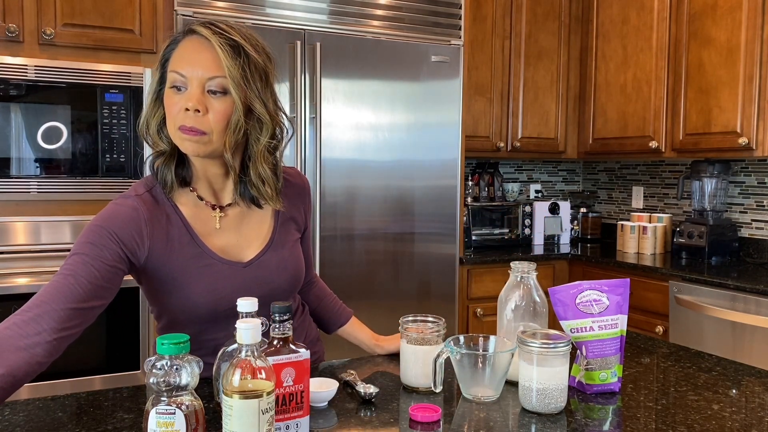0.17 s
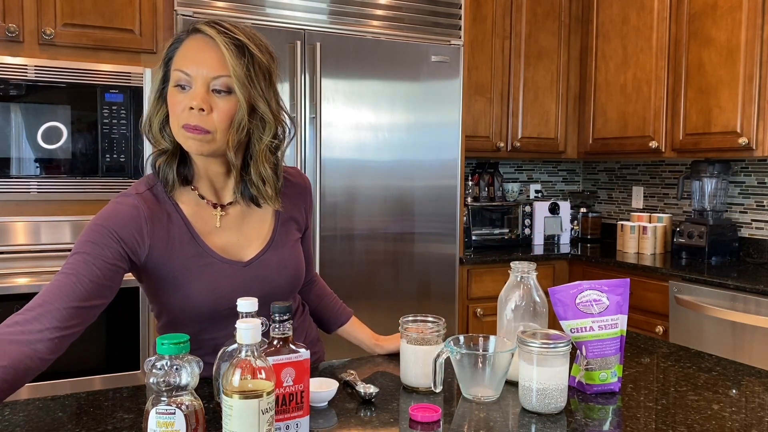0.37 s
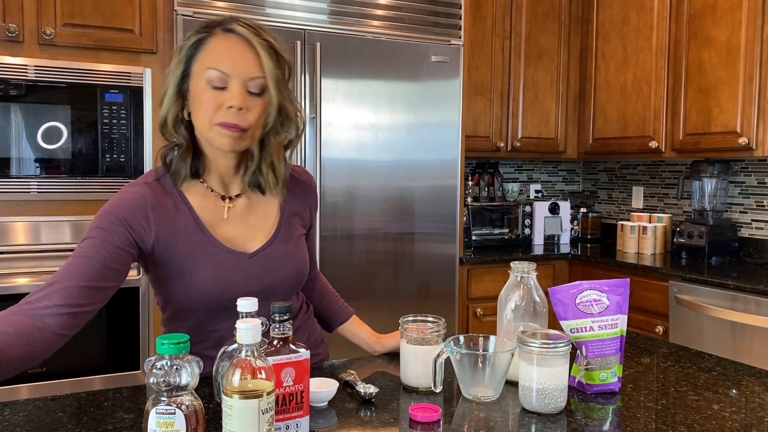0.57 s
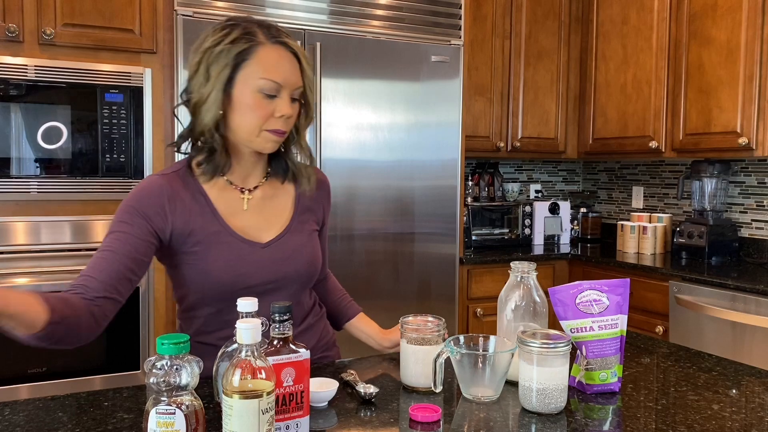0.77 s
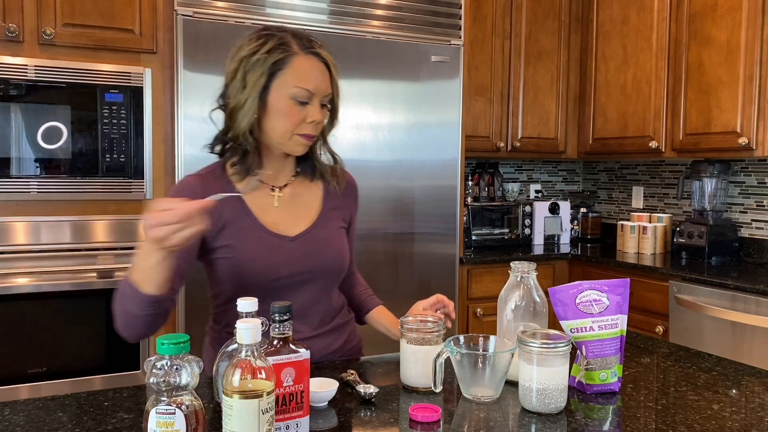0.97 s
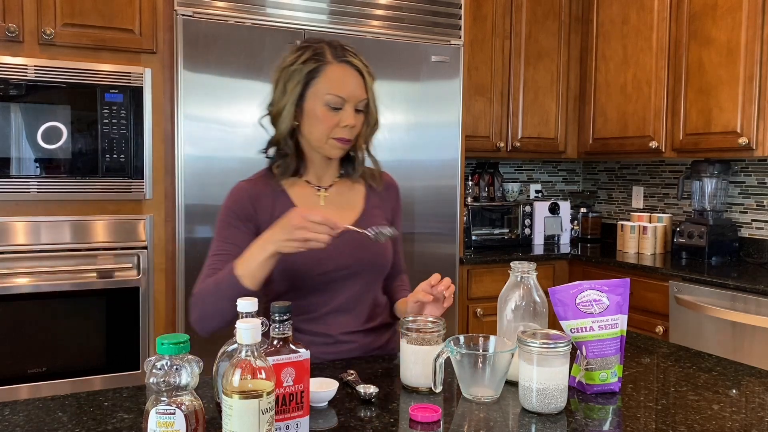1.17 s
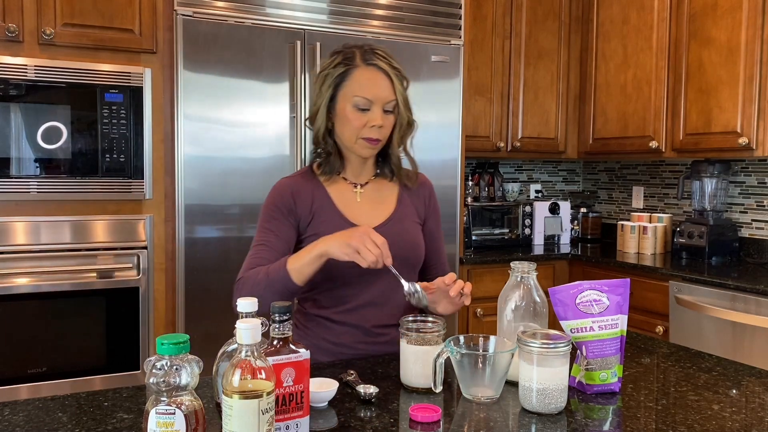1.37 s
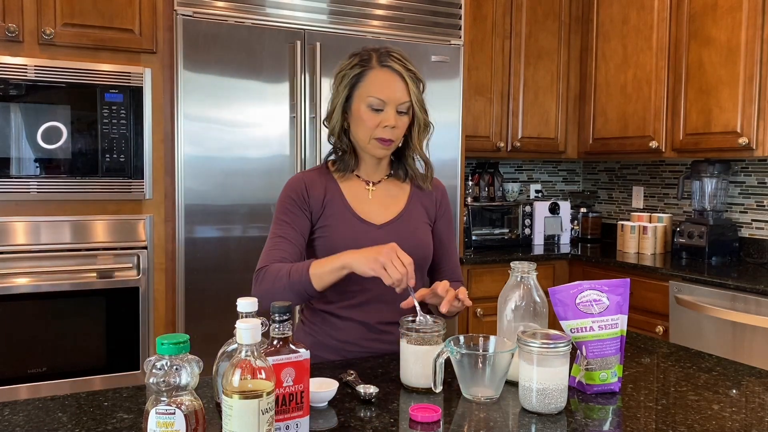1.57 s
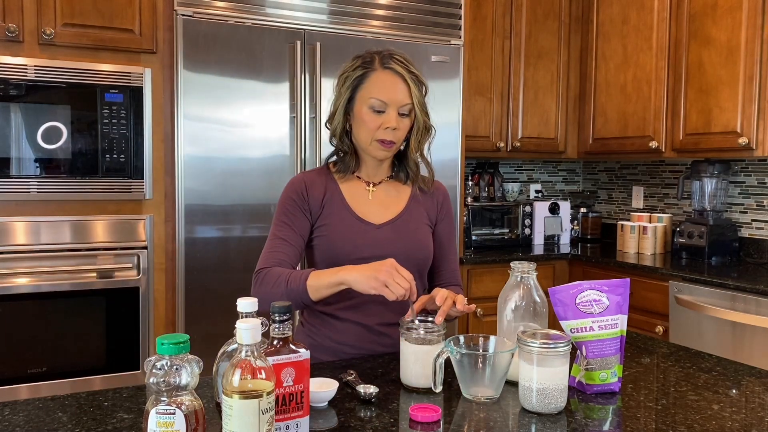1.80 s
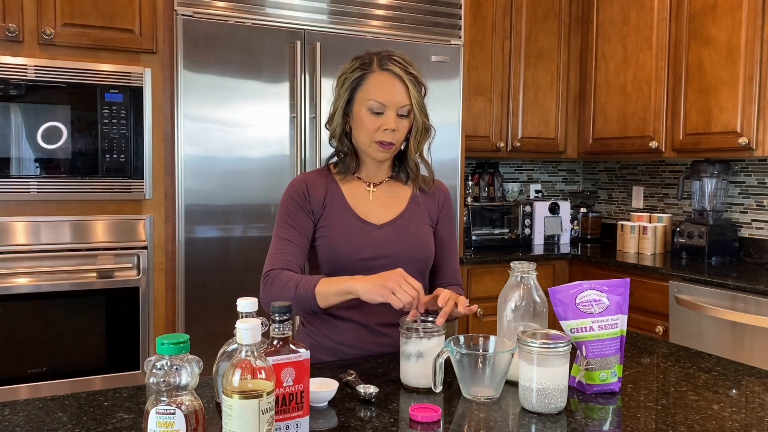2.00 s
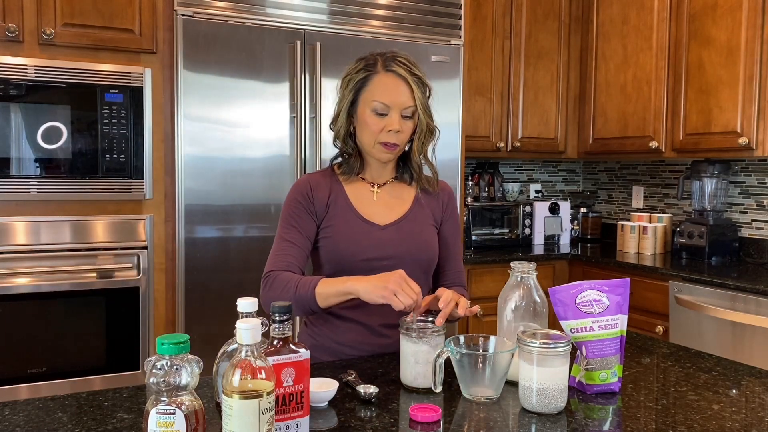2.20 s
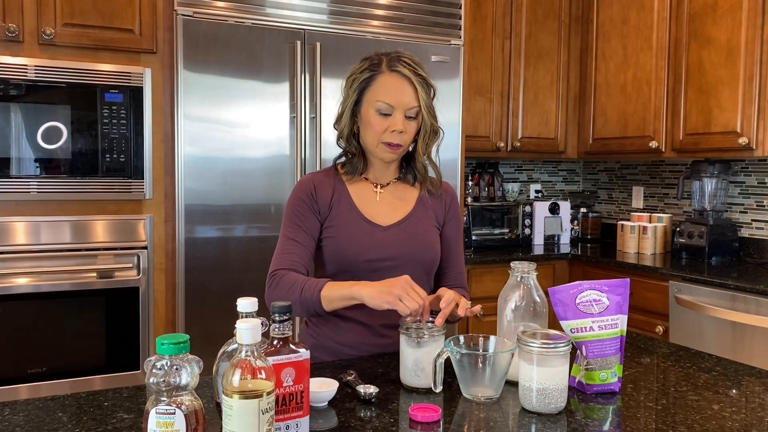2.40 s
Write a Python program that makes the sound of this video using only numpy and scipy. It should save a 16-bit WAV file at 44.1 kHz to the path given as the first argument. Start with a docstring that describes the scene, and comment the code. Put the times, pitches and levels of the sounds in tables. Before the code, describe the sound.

Cutlery clatters in a wooden drawer on the left, loudest at about 0.2 seconds with a low thump, the roll fading by 0.7. A sleeve rustles faintly. After a soft bump near 1.5 seconds, a metal spoon clinks brightly on a glass jar at 1.7, taps twice around 2.2, then rattles dully on the bottom at 2.4. The kitchen echoes briefly over a quiet, low room tone.

```python
"""Cutlery clatters in a drawer off to the left, steel clashing and ringing as the drawer rolls and thumps.
A sleeve rustles, there is a soft bump, and a metal spoon clinks on a glass jar, ringing both glass and
spoon. It touches twice more, then rattles dully against the bottom, damped by a thick mixture.
The hard kitchen rings after the cutlery and the jar, over a quiet, low room tone."""
import sys
import numpy as np
from scipy import signal
from scipy.fft import rfft, irfft
from scipy.io import wavfile
from scipy.ndimage import uniform_filter1d

SR = 44100
rng = np.random.default_rng(int(sys.argv[2]) if len(sys.argv) > 2 else 0)


def dump_mix(stems):
    """Bounce the given channels to the path in sys.argv[1] as a 16-bit WAV at rate SR."""
    frames = np.atleast_2d(stems).T  # one column per channel
    limited = np.clip(frames, -1, 1)  # hard clip at full scale
    pcm = np.round(limited * 32767).astype(np.int16)
    wavfile.write(sys.argv[1], SR, pcm)


N = 108045
LEAD = SR // 10  # pre-roll in samples, so a hit can already be ringing at the start
T = np.arange(SR * 3 // 4) / SR  # seconds since a hit

# Cutlery hits. Each row: start in seconds, pile ring in dB, its tilt in dB per octave, loose spoon in dB,
# clash in dB, clash decay in seconds, clash tilt in dB per octave. Levels are relative within a layer.
CUTLERY_HITS = [(-.045, -31, 0, -44, -9, .014, -3), (0.023, -39.5, 2.5, -49, -22, .003, -1),
                (0.2193, -18, 0, -41.5, 1, 0.0013, 3.5), (0.2244, -21, 2.5, -32.5, -10, .005, -0.5),
                (.2355, -15.5, -3, -44.5, -4, .012, -4.5), (.266, -29, -3.5, -45, -13, .018, -8),
                (.4775, -42.5, 2, -46, -22, .002, 4)]
# Modes of the pile, then of a spoon ringing free. Each row: pitch in Hz, level in dB, t60 in seconds.
PILE_MODES = [(753, -8.5, 0.15), (773, -8.5, 0.12), (1507.6, -5.5, .14), (1864.5, -10.5, 0.18),
              (2513, -8, 0.054), (2611, -2, .1), (3250, -7.5, .06), (5500, -11, .05), (7104, -7, .07),
              (7226, 3, 0.037), (8468, -12.5, 0.085), (13900, -29.5, .04)]
LOOSE_SPOON_MODES = [(4745, -3, .24), (6850, -5, .1), (7302, -2, .14), (10250, -9, .16)]
# EQ of the clash in the tray. Each row: frequency in Hz, gain in dB.
CLASH_EQ = [(100, -13.5), (400, -11), (800, 2.5), (1600, 7.5), (3200, 5.5), (4300, -4.5), (4800, 2.5),
            (5600, 4), (6400, -13), (7100, -4), (8000, -14), (9500, -23), (11500, -13), (13000, -36.5),
            (15000, -25.5)]
DRAWER_SPOT = dict(direct_db=.5, near_db=-2, room_db=-1.5, left_db=2.5, lag_s=.0003)


def cutlery():
    """Loose steel pieces clash and ring briefly, each hit with its own reflections."""
    out = np.zeros((2, N))
    for start, pile_db, pile_tilt, loose_db, clash_db, decay_s, clash_tilt in CUTLERY_HITS:
        pile = amp(pile_db) * ring(PILE_MODES, pile_tilt) / 2
        loose_spoon = amp(loose_db) * ring(LOOSE_SPOON_MODES)
        clash = amp(clash_db) * 2 * colour(burst(decay_s), CLASH_EQ, clash_tilt)
        hit = np.zeros(N + LEAD)
        add(hit, start, pile + loose_spoon + clash)
        out += place(low_cut(hit, hz=200), **DRAWER_SPOT)
    return out


# Drawer thumps. Each row: start in seconds, relative level in dB.
THUMP_HITS = [(0.224, -23.5), (0.264, -34)]
# Modes of the wooden box. Each row: pitch in Hz, level in dB, t60 in seconds.
DRAWER_MODES = [(86, -3.5, 0.49), (115, -1, 0.29), (282.4, -5.5, .2)]
# Fader moves of the roll. Each row: time in seconds, level in dB.
ROLL_FADER = [(0, -58), (.13, -59.5), (0.198, -64.5), (.33, -60.5), (.52, -61), (.62, -73), (.72, -95)]
# EQ of the runners. Each row: frequency in Hz, gain in dB.
RUNNER_EQ = [(30, -21.5), (110, -1), (300, -1.5), (550, -3.5), (1000, -11), (3000, -28), (16000, -48.5)]


def drawer():
    """The wooden drawer rumbles on its runners and booms when knocked."""
    thumps = np.zeros(N + LEAD)
    attack = 1 - np.exp(-T / .008)
    for start, db in THUMP_HITS:
        add(thumps, start, amp(db) * ring(DRAWER_MODES) * attack / 2)
    return thumps[LEAD:] + fader(ROLL_FADER) * wide_noise(RUNNER_EQ)


# Clinks on the jar wall. Each row: start in seconds, glass in dB, its tilt in dB per octave,
# its pitch ratio, its ring time ratio, spoon in dB, relative tick level in dB.
WALL_CLINKS = [(1.6843, -17, -4.5, 1, 1, -32.5, -8.5), (2.1563, -21.5, -14, 0.98, 0.44, -39, -16.5),
               (2.223, -37, 2.5, 1, 0.27, -41, -22.5)]
# Rattle on the jar bottom. Each row: start in seconds, ring in dB, relative tick level in dB.
BOTTOM_KNOCKS = [(2.366, -23.5, -27.5), (2.3691, -26.5, -50), (2.3716, -28.5, -30.5), (2.3774, -29, -56),
                 (2.3864, -26, -51), (2.423, -29.5, -43)]
# Modes of the glass wall, the held spoon pressed against it, and the filled jar on the counter.
# Each row: pitch in Hz, level in dB, t60 in seconds.
GLASS_MODES = [(1620, -2, 0.19), (3663, 8.5, 0.058), (3657, -16, 0.41), (5764, 14, 0.037),
               (5768, -24.5, 0.24), (9970, -11, 0.052), (12300, -25, .03), (14600, -20, 0.038)]
HELD_SPOON_MODES = [(407, -3, 0.031), (892, 10, 0.021), (1113, 5.5, 0.048), (2064, -3, 0.06),
                    (3055, 0, 0.045), (4544, -3.5, .06), (4860, 1.5, 0.056), (8200, -2.5, .03)]
BOTTOM_MODES = [(128, -24, 0.25), (231, -20, 0.066), (612, -11.5, 0.031), (934, -10, 0.026),
                (1182, -4.5, 0.023), (1329, -0.5, 0.023), (1622, -8, 0.036), (4740, -14, 0.012)]
# EQ of the metal-on-glass tick. Each row: frequency in Hz, gain in dB.
TICK_EQ = [(100, -40.5), (250, -51), (420, -27.5), (600, -6), (950, 7.5), (2000, 12.5), (2600, 7.5),
           (5800, 11.5), (7200, 0.5), (9000, -2.5), (12500, 4.5), (16000, -4.5)]
JAR_SPOT = dict(direct_db=-4.5, near_db=-6.5, room_db=-5, left_db=1.16, lag_s=.00001)


def spoon_in_jar():
    """The spoon ticks on the wall, ringing the glass and itself, then chatters on the damped bottom."""
    def tick(db):
        return amp(db) * 2 * colour(burst(decay_s=.0009), TICK_EQ)

    out = np.zeros(N + LEAD)
    for start, glass_db, tilt_db, pitch, length, spoon_db, tick_db in WALL_CLINKS:
        glass = amp(glass_db) * ring(GLASS_MODES, tilt_db, pitch, length)
        spoon = amp(spoon_db) * ring(HELD_SPOON_MODES)
        add(out, start, glass + spoon + tick(tick_db))
    out = low_cut(out, hz=325)  # wall clinks only: the bottom keeps its body
    for start, ring_db, tick_db in BOTTOM_KNOCKS:
        add(out, start, amp(ring_db) * ring(BOTTOM_MODES) + tick(tick_db))
    return place(out, **JAR_SPOT)


# EQ of the bump. Each row: frequency in Hz, gain in dB.
BUMP_EQ = [(60, -13), (200, 3.5), (350, -0.5), (600, -5), (1500, -16), (4000, -25), (16000, -61)]


def hand_bump():
    """A faint, dull bump as a hand touches the jar, just before the spoon goes in."""
    out = np.zeros(N + LEAD)
    thud = amp(-16.5) * colour(burst(decay_s=.047), BUMP_EQ)
    add(out, start_s=1.55, sound=thud)
    return place(out, **JAR_SPOT)


# Fader moves of the sleeve. Each row: time in seconds, soft swish in dB, fine hiss in dB.
SLEEVE_FADERS = [(0, -68, -97), (.7, -71, -79), (.85, -73.5, -78), (1.1, -69, -82.5), (1.3, -80, -78),
                 (1.52, -93, -90), (1.57, -69.5, -84), (1.6, -81.5, -65.5), (1.68, -60.5, -79),
                 (1.951, -79, -75.5), (2.121, -79, -65), (2.3, -74, -76), (2.45, -83, -69)]
# EQ of the swish, then of the hiss. Each row: frequency in Hz, gain in dB.
SWISH_EQ = [(100, -4), (300, 3.5), (700, -6), (1500, 1), (4000, -8), (8000, -18.5), (16000, -29)]
HISS_EQ = [(100, -18.5), (1500, -9), (5000, 3), (8000, -10), (11000, 3), (15000, -6), (16500, -6.5)]


def sleeve():
    """Cloth swishes faintly as the arm moves, with separate noise in each ear."""
    swish, hiss = fader(SLEEVE_FADERS, column=1), fader(SLEEVE_FADERS, column=2)
    return np.array([swish * noise(SWISH_EQ) + hiss * noise(HISS_EQ) for ear in range(2)])


# EQ of the room tone. Each row: frequency in Hz, gain in dB.
ROOM_TONE_EQ = [(20, -19.5), (50, -1.5), (80, -1.5), (130, -6.5), (250, -14.5), (600, -22), (2000, -29.5),
                (7000, -36), (16000, -46)]


def room_tone():
    """The low, steady rumble of the kitchen."""
    return amp(-68) * wide_noise(ROOM_TONE_EQ)


# Stereo width of the roll and the room tone. Each row: frequency in Hz, side gain in dB.
RUMBLE_WIDTH = [(30, -15), (120, -8.5), (300, -7), (800, -1.5), (16000, -7.5)]


def wide_noise(eq):
    """A stereo noise bed, narrow in the bass."""
    mid, side = noise(eq), colour(noise(eq), RUMBLE_WIDTH)
    return np.array([mid + side, mid - side])


# Reverb time of the kitchen. Each row: frequency in Hz, t60 in seconds.
REVERB_TIMES = [(80, 0.18), (250, 0.91), (700, 0.45), (1800, .58), (4000, 0.48), (7000, 0.32), (14000, .3)]
# EQ of the whole reverb, then of its side channel. Each row: frequency in Hz, gain in dB.
REVERB_EQ = [(60, -3), (1000, 0), (6000, 2), (9000, -5.5), (11500, -1.5), (13200, -11), (16000, -8.5)]
REVERB_WIDTH = [(60, -13), (150, -12), (400, -4), (1000, -1), (16000, -3)]


def reflections(near_db, room_db):
    """Near surfaces answer first, then a tail with each band dying at its own speed, the bass near mono."""
    hz, t, bands = signal.stft(rng.standard_normal((2, len(T))), SR, nperseg=256)
    decay = amp(-60 * t / curve_at(REVERB_TIMES, hz)[:, None])
    tails = signal.istft(bands * decay, SR, nperseg=256)[1][:, :len(T)]
    attack = 1 - np.exp(-T / .0027)
    spectrum = rfft(tails * attack)
    contour = np.sqrt(uniform_filter1d(abs(spectrum) ** 2, size=40, axis=1))
    fade_out = np.minimum(2 - 2 * T / T[-1], 1) ** 2
    tails = amp(room_db) * irfft(spectrum / contour, len(T)) * fade_out  # flattened before the EQ
    mid, side = (colour(tail + amp(near_db) * burst(decay_s=.0086), REVERB_EQ) for tail in tails)
    side = colour(side, REVERB_WIDTH)
    return np.array([mid + side, mid - side]) / np.sqrt(2)


def place(x, direct_db, near_db, room_db, left_db, lag_s):
    """Direct sound, lagging in the right ear, plus reflections; pans left and trims the pre-roll."""
    response = reflections(near_db, room_db)
    response[0, 0] += amp(direct_db)
    response[1, round(lag_s * SR)] += amp(direct_db)
    pan = amp([[left_db / 2], [-left_db / 2]])
    return signal.fftconvolve(x[None], response, axes=1)[:, LEAD:LEAD + N] * pan


def ring(modes, tilt_db=0, pitch=1, length=1):
    """The dying sines of a struck object, tilted per octave from its first mode."""
    sines = np.zeros(len(T))
    for hz, db, t60 in modes:
        level_db = db + tilt_db * np.log2(hz / modes[0][0])
        sines += amp(level_db - 60 * T / (t60 * length)) * np.sin(2 * np.pi * hz * pitch * T)
    attack = 1 - np.exp(-T / .0006)
    return sines * attack


def burst(decay_s):
    """A dying puff of noise with energy 1."""
    x = rng.standard_normal(len(T)) * np.exp(-T / decay_s)
    return x / np.linalg.norm(x)


def noise(eq):
    """Steady coloured noise of rms 1."""
    x = colour(rng.standard_normal(N + LEAD), eq)[LEAD:]
    return x / x.std()


def colour(x, eq, tilt_db=0):
    """Minimum-phase EQ, with a tilt per octave that pivots at 3 kHz and levels off below 500 Hz."""
    size = 8192
    hz = abs(np.fft.fftfreq(size, 1 / SR))
    octaves = np.log2(np.maximum(hz, 500) / 3000)
    log_gain = np.log(amp(curve_at(eq, hz) + tilt_db * octaves))
    response = np.exp(np.conj(signal.hilbert(log_gain)))
    taps = np.fft.ifft(response).real[:size // 2]
    return signal.fftconvolve(x, taps)[:len(x)]


def low_cut(x, hz):
    """Rolls off the lows below the given frequency."""
    return signal.sosfilt(signal.butter(3, hz, "high", fs=SR, output="sos"), x)


def curve_at(points, hz):
    """Reads a curve over log frequency."""
    frequencies, values = np.transpose(points)
    return np.interp(np.log(hz + 1), np.log(frequencies + 1), values)


def fader(moves, column=1):
    """Gain over the scene, gliding between levels in dB."""
    columns = np.transpose(moves)
    return amp(np.interp(np.arange(N) / SR, columns[0], columns[column]))


def add(track, start_s, sound):
    """Lays a sound into a track that has pre-roll."""
    part = track[max(round(start_s * SR) + LEAD, 0):][:len(sound)]
    part += sound[:len(part)]


def amp(db):
    """Decibels to gain."""
    return 10 ** (np.asarray(db) / 20)


def scene():
    """The stereo mix of the kitchen."""
    return cutlery() + drawer() + hand_bump() + spoon_in_jar() + sleeve() + room_tone()


def record(dry):
    """A steep high cut at 16.5 kHz."""
    high_cut = signal.firwin(511, 16500, window=("kaiser", 9), fs=SR)
    return signal.oaconvolve(dry, high_cut[None], "same")


dry = scene()
out = record(dry)
dump_mix(out)
```